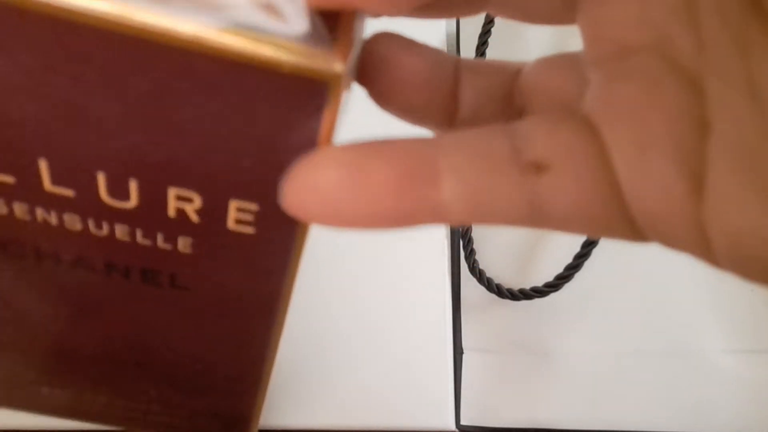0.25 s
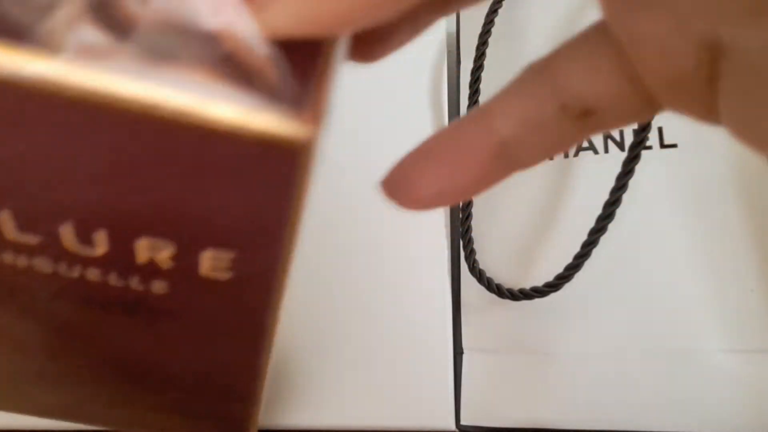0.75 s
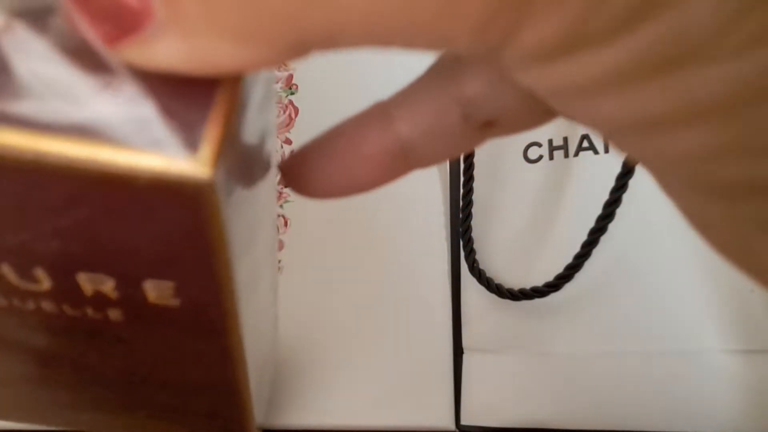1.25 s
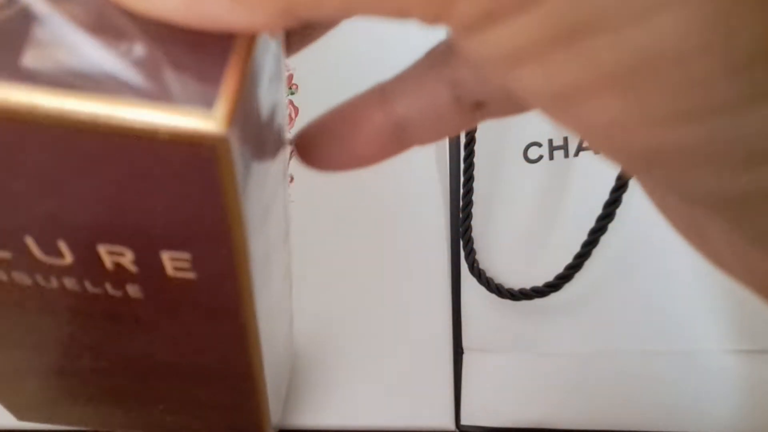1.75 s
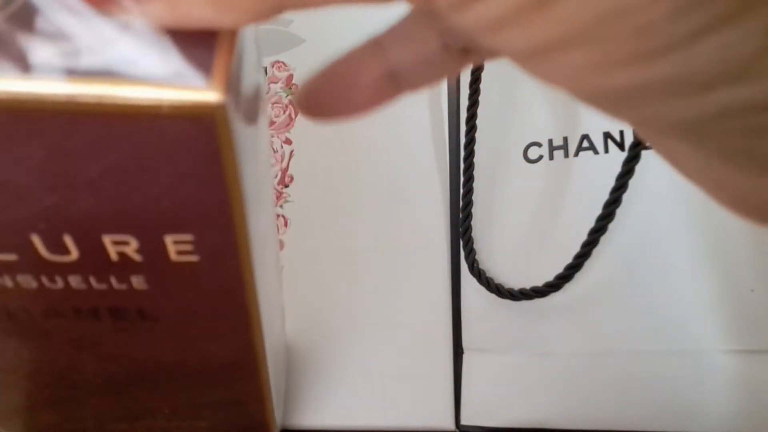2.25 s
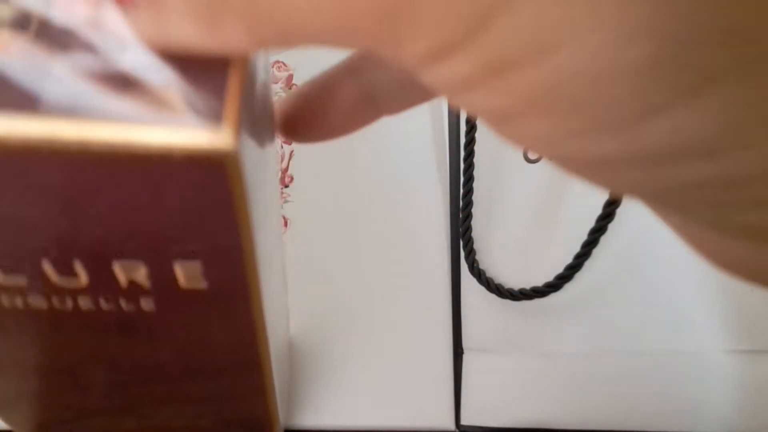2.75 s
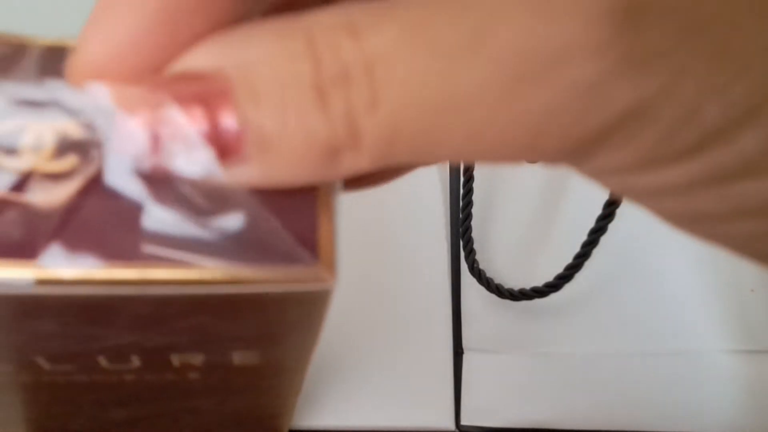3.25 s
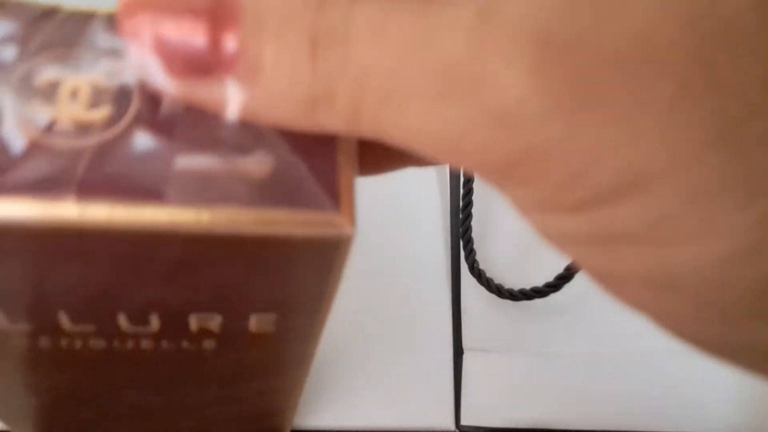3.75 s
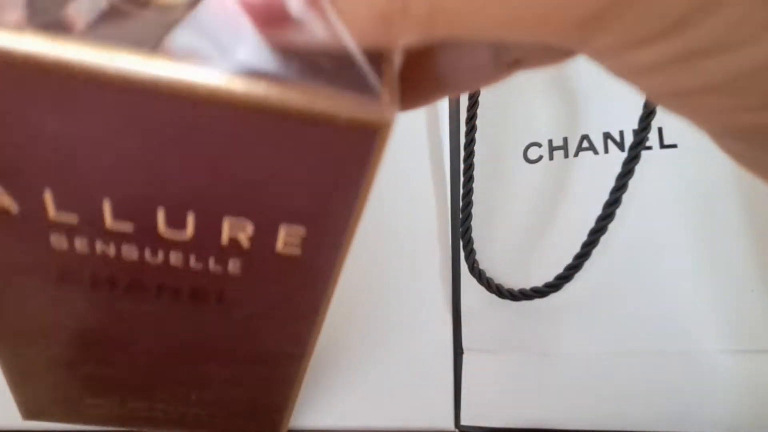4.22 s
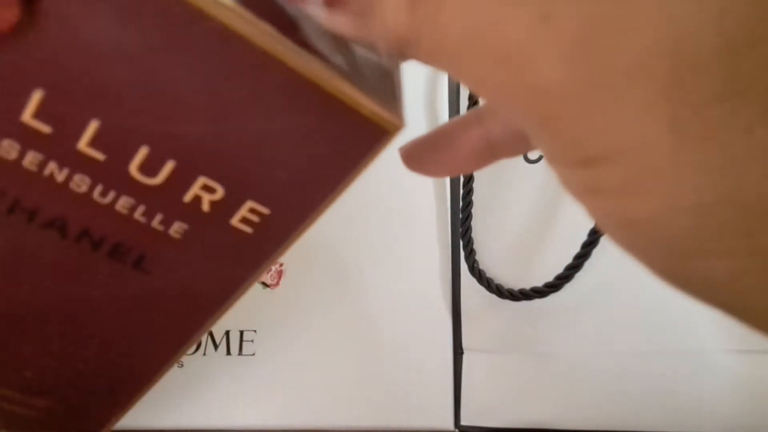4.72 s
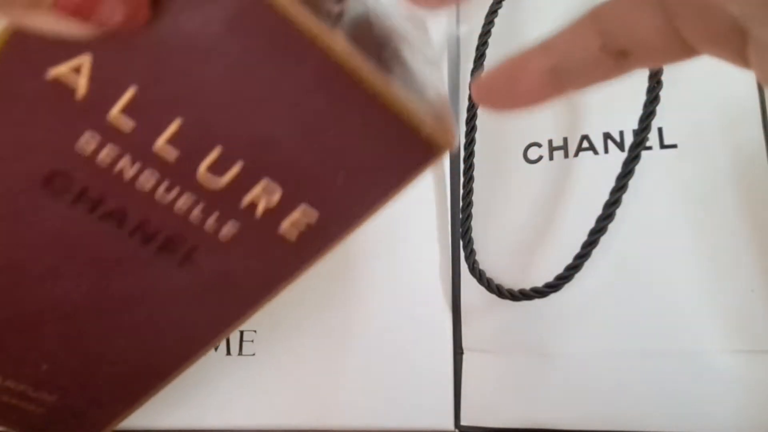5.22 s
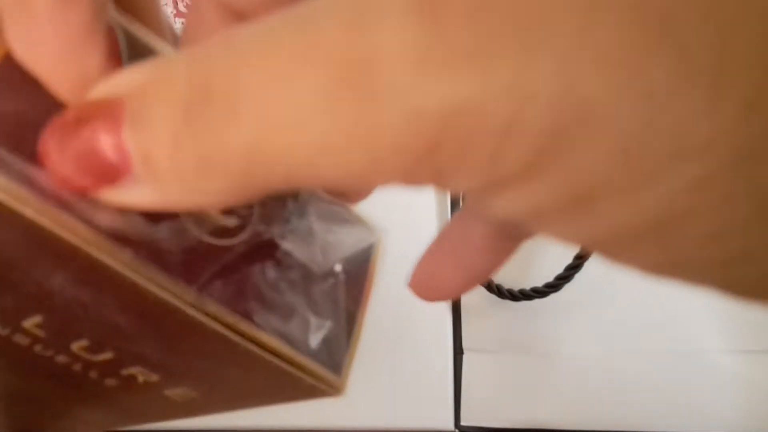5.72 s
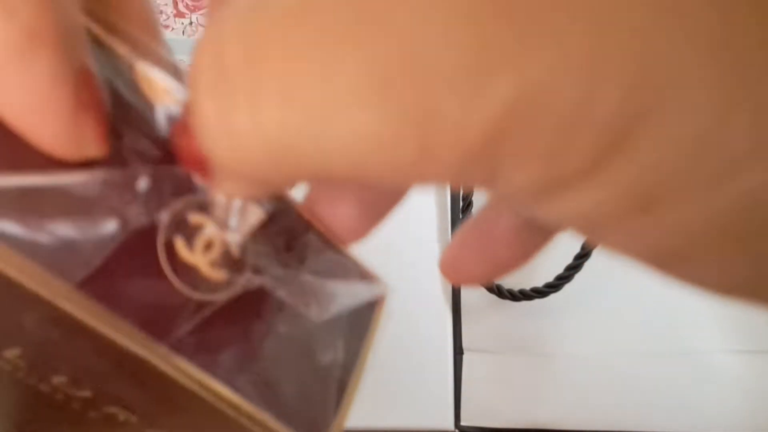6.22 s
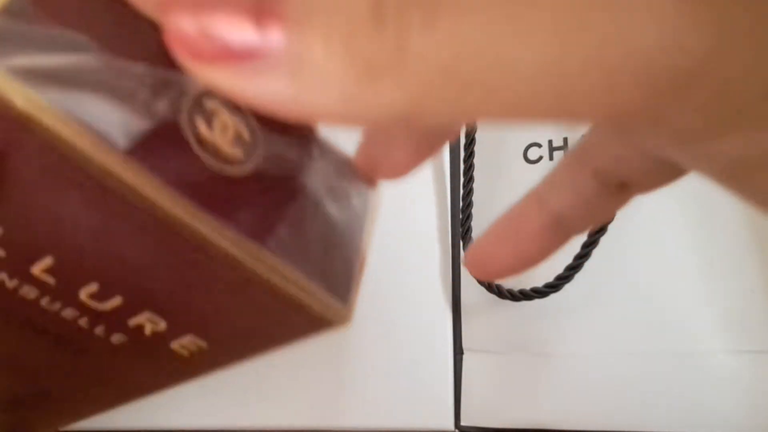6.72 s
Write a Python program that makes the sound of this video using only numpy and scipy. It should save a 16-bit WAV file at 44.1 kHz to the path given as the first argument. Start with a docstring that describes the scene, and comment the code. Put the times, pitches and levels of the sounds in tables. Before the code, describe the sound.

Very close, fingers pick at crisp cellophane on a small cardboard box. Sparse bright snaps and fine crinkles mix with soft hollow fingertip thumps and brief grainy rubs. After a quieter middle, the crackling thickens and loosens, then the seal tears in a rapid run of loud cracks with one very short falling squeak. Small room, close stereo microphone leaning left, faint steady hush.

```python
"""Sharp crackles and soft thumps: fingers pick and peel the cellophane off a small cardboard box, close by.
Creases snap as short clicks plus decaying noise, and shake the box; tiny creases crinkle in between.
Fingertips knock, which rings the box's own pitches, and slide, which makes filtered grainy noise.
Near the end the seal tears open in a run of loud cracks and one short squeak, a wavering falling tone.
A small room adds close echoes, a faint tail and a steady hush."""
import sys
import numpy as np
from scipy import signal
from scipy.fft import rfft, irfft, next_fast_len
from scipy.io import wavfile
from scipy.ndimage import uniform_filter1d

SR = 44100
rng = np.random.default_rng(int(sys.argv[2]) if len(sys.argv) > 2 else 0)


def master(y):
    """Save y as 16-bit WAV."""
    cut = np.clip(np.atleast_2d(y).T, -1, 1)
    pcm = np.round(cut * 32767)  # scale
    wavfile.write(sys.argv[1], SR, pcm.astype(np.int16))


N = 307377

# The creases that snap loudly. Each row: start in seconds, relative energy of the bright tick in dB,
# how hard the box answers compared with the tick in dB (before a small trim).
SNAPS = [(0.179, -19, -25), (0.2075, -8.5, -11.5), (0.2885, -17, -12), (0.3895, -17, -12.5),
         (0.434, -14, -14), (0.5852, -13, -22), (0.6356, -15, -20), (0.6833, -8, -22.5),
         (0.6951, -11.5, -15), (0.7884, -11, -10), (0.9223, -15, -14), (1.2393, -27.5, 0),
         (1.4148, -16.5, -10.5), (1.4376, -13, -14.5), (1.609, -8, -15), (1.7002, -16.5, -12),
         (1.7403, -2.5, -19.5), (2.008, -24, -6.5), (2.0531, -19.5, -2.5), (2.0624, -15, -14.5),
         (2.2018, -17.5, -11.5), (2.6856, -17.5, -14), (2.7004, -12, -12), (2.8074, -14, -10),
         (2.912, -12.5, -18), (2.9448, -23.5, -7), (2.9759, -12.5, -17), (2.9989, -18, -12),
         (3.0499, -18, -10), (3.1486, -15, -17), (3.1913, -22, -7.5), (3.268, -15, -13.5),
         (3.344, -25.5, -14), (3.431, -19.5, -6), (3.4762, -13, -20.5), (3.5503, -28.5, 0),
         (3.836, -21.5, -3.5), (3.9912, -8.5, -20), (4.0933, -7.5, -28.5), (4.1134, -13.5, -3),
         (4.1725, -15, -6), (4.2563, -22.5, -4), (4.3056, -9, -19), (4.3185, -11, -15.5),
         (4.4777, -15, -11), (4.5195, -12, -8.5), (4.5372, -16, -2.5), (4.5999, -22.5, 0.5),
         (4.623, -7.5, -14), (4.716, -22, -12), (4.7492, -22.5, -15.5), (4.8046, -5, -17),
         (4.829, -10.5, -18.5), (4.8963, -12, -7.5), (5.0432, 0.5, -14.5), (5.1087, -15, -3.5),
         (5.1663, -22.5, -10), (5.2377, -5, -17), (5.2845, 3, -20), (5.3334, -7.5, -23), (5.449, -35, 14.5),
         (5.5033, -8, -30.5), (5.5804, -18.5, -11), (5.6057, -15, 0.5), (5.639, -7, -14),
         (5.7053, -17.5, -14), (5.7229, -6, -14.5), (5.7302, -15, -6.5), (5.7611, -9, -23.5),
         (5.9738, -9, -20), (6.0059, -13.5, -17.5), (6.0467, -7.5, -21), (6.1459, -11, -20.5),
         (6.1831, 2.5, -13.5), (6.2016, 2, -7), (6.205, 0, -26), (6.2251, -2, -22), (6.2954, -9, -11),
         (6.361, 5.5, -6.5), (6.3786, -6.5, -16), (6.3966, -2.5, -8.5), (6.4968, -16.5, -13),
         (6.5531, -12, -6), (6.5699, 0, -8), (6.5851, 2.5, -25), (6.6316, -6.5, 3), (6.6447, -8.5, -3),
         (6.6561, -2.5, -20), (6.7102, -3.5, -3), (6.7642, -17, -9), (6.777, -21.5, 4.5),
         (6.8361, -8.5, -6.5), (6.894, -11.5, -0.5), (6.9062, -2, -4), (6.9203, -21, 1)]


def amp(db):
    """Turns decibels into gain."""
    return 10 ** (np.asarray(db) / 20)


def read(points, hz):
    """Reads a table of (Hz, value) at any frequency, joining its points on a log-frequency axis."""
    f, value = np.transpose(points)
    return np.interp(np.log(hz + 1), np.log(f), value)


def unit(x):
    """Scales a sound to a total energy of 1, averaged over its channels."""
    return x / np.sqrt(np.mean(np.sum(x ** 2, -1)) + 1e-20)


def add(mix, s, sound):
    """Lays a sound into the mix at time s in seconds."""
    start = max(round(s * SR), 0)
    part = mix[:, start:][:, :sound.shape[-1]]
    part += sound[..., :part.shape[1]]


def colour(points, size=2048):
    """Makes the most compact impulse response with this spectrum (minimum phase: nothing sounds early)."""
    log_gain = np.log(amp(read(points, abs(np.fft.fftfreq(size, 1 / SR)))))
    return np.fft.ifft(np.exp(np.conj(signal.hilbert(log_gain)))).real[:size // 2]


def through(x, response):
    """Filters x by an impulse response, keeping its length."""
    return signal.fftconvolve(np.atleast_2d(x), np.atleast_2d(response), axes=1)[:, :x.shape[-1]]


def snaps(colours, db=0.53, box_trim_db=-0.4, after_db=-19, after_s=0.012, lead_in_db=-20):
    """Each loud snap has a faint copy 1 to 2 ms ahead of it, and quieter snaps follow."""
    out = np.zeros((2, N))
    for s, tick_db, box_db in SNAPS:
        tick, crack, answer = snap(colours)
        # a large crease shakes the box and also cracks lower; so does film that has come loose
        loose_db = 4 if s > 4.3 else 0
        crack_db = -4 + 0.6854 * box_db + loose_db
        film = amp(tick_db) * (tick + amp(crack_db) * crack)
        add(out, s, film + amp(tick_db + box_db + box_trim_db) * answer)
        add(out, s - rng.uniform(0.001, 0.002), amp(lead_in_db) * film)
        waits, varies_db = rng.exponential(after_s, size=3), rng.normal(0, 5.2, size=3)
        for wait, vary_db in zip(waits, varies_db):
            # later followers tend to be quieter
            add(out, s + wait, amp(after_db + vary_db - 6 * wait / after_s) * film)
    return amp(db) * out


def snap(colours, size=2048):
    """One flip of the film, as three parts of energy 1: bright tick, lower crack, answer of the box's panels."""
    t = np.arange(size) / SR
    tick = burst(t, flutter_s=0.00085, flutter_db=-1, facet_db=-8, ring_s=0.0014, ring_db=-5.0)
    # slower waves linger in the crack
    crack = burst(t, flutter_s=0.00054, flutter_db=14, facet_db=7, ring_s=0.0027, ring_db=9.0)
    push = rng.standard_normal(size) * (np.exp(-t / 0.00064) + 0.5 * np.exp(-t / 0.0096))
    return [unit(through(x, response)) for x, response in zip((tick, crack, push), colours)]


def burst(t, flutter_s, flutter_db, facet_db, ring_s, ring_db):
    """A crease flips (a click), the film flutters (noise) and one facet rings at its own pitch."""
    # Tone on the right. Each row: frequency in Hz, relative level in dB.
    right_tone = [(200, 4), (1100, 6.5), (2300, 13), (3700, -8), (5500, 7), (7500, 1), (9500, -49),
                  (12500, -5), (15500, -17.5)]
    flutter, own, ring_left, ring_right = rng.standard_normal((4, len(t)))
    attack = 1 - np.exp(-t / 0.00011)
    fade = np.exp(-t / (flutter_s * rng.uniform(1.0, 1.35))) * attack
    facet = unit(np.sin(2 * np.pi * rng.uniform(2280, 14060) * t) * np.exp(-t / 0.00052))
    flip = np.roll(t == 0, rng.integers(2, 12)) * rng.choice([-1, 1])
    left = flip + amp(flutter_db) * unit(flutter * fade) + amp(facet_db) * facet
    right = through(0.12 * left + 0.78 * unit(own * fade), colour(right_tone))[0]
    right = right * amp(rng.normal(0, 1.2))
    ring = unit(np.array([ring_left, 0.72 * ring_right]) * np.exp(-t / ring_s))
    return np.array([left, right]) + amp(ring_db) * ring


def crinkle(colours, per_s=110, spread_db=7.5, crack_db=-11, relax_s=0.032, rubbed_db=29,
            stray_per_s=10, stray_db=-46, count=24):
    """Strain builds around snaps and under a sliding finger; tiny creases give way, a few even at rest."""
    full_strain_db = -36.5
    strain_follow = 0.42  # how closely strain follows the strength of a snap, 0 to 1
    build_share = 0.35  # strain before a snap, compared with after it
    jolts = np.zeros(N)
    for s, tick_db, _ in SNAPS:
        jolts[min(int(s * SR), N - 1)] = amp(strain_follow * tick_db)
    fading = [1, -np.exp(-1 / (relax_s * SR))]
    relaxing = signal.lfilter([1], fading, jolts)
    building = signal.lfilter([1], fading, jolts[::-1])[::-1]  # run backwards in time
    strain = relaxing + build_share * building + amp(rubbed_db) * rubbing()
    strained = (rng.random(N) < per_s * np.sqrt(strain) / SR) * strain * amp(full_strain_db)
    stray = (rng.random(N) < stray_per_s / SR) * amp(stray_db)
    flips = (strained + stray) * amp(spread_db * np.minimum(rng.exponential(1, N), 3))
    creases = []
    for _ in range(count):
        tick, crack, _answer = snap(colours)
        creases.append(tick + amp(rng.normal(crack_db, 6.9)) * crack)
    out = np.zeros((2, N))
    for at in np.flatnonzero(flips):
        add(out, at / SR, flips[at] * creases[at % count])
    return out


def knocks(size=10000, focus_db=6.0, chatter=0.79, place_db=2):
    """A soft push lands and settles; the box's own pitches near the centre of the push ring most."""
    # The box's own ringing pitches. Each row: frequency in Hz, relative level in dB,
    # time to fade by 60 dB in seconds.
    box_modes = [(77, -8.5, 0.0568), (134.8, -1.5, 0.078), (244.7, 1, 0.1), (326.5, -3, 0.046),
                 (439.3, 2.5, 0.06), (564, -13, 0.053), (707, -1.5, 0.03), (1038, -2.5, 0.015)]
    out, t = np.zeros((2, N)), np.arange(size) / SR
    for s, db, contact_s, centre_hz in pushes():
        ring = np.zeros(size)
        press = t / contact_s * np.exp(-t / contact_s)
        for hz, mode_db, t60 in box_modes:
            turn = 2 * np.pi * hz * rng.normal(1, 0.046) * t  # the grip detunes each mode
            rough = 10 * chatter * rng.standard_normal(size)
            force = press * (np.sin(turn + 2 * np.pi * rng.random()) + rough)
            mode = unit(through(force, np.sin(turn) * amp(-60 * t / t60))[0])
            off_centre_db = focus_db * np.log2(hz / centre_hz) ** 2
            ring += amp(mode_db + place_db * rng.standard_normal() - off_centre_db) * mode
        add(out, s, amp(db + 5.0) * unit(ring))
    return out


def pushes():
    """Fingertips and the hardest snaps push the box: rows of (s, relative level dB, contact s, centre Hz)."""
    # Fingers bump the box. Each row: start in seconds, relative level in dB, centre of the push in Hz.
    bumps = [(0.000, -20.5, 278), (0.135, -12.5, 357), (0.355, -25.5, 603), (1.228, -20.5, 296),
             (1.534, -33.5, 415), (1.690, -14, 380), (2.412, -33, 482), (2.667, -28, 475),
             (2.944, -20.5, 385), (3.540, -30, 450), (4.484, -12, 312), (5.039, -20, 493),
             (6.177, -13.5, 110)]
    landing_s = 0.0058  # how long a fingertip takes to land
    # a snap that shakes the box harder than this also rocks it, like a brief knock
    jolt_over_db = -22
    jolt_db, jolt_s, jolt_hz = -18, 0.0014, 450
    rows = [(s, db, landing_s, hz) for s, db, hz in bumps]
    for s, tick_db, box_db in SNAPS:
        if tick_db + box_db > jolt_over_db:
            rows.append((s, tick_db + box_db + jolt_db, jolt_s, jolt_hz))
    return rows


def slide(grip_db=0.0):
    """Rubbing skin makes the dull murmur of the grip, and the brighter strokes of a fingertip."""
    # The grip on the box tightens as the work goes on. Each row: time in seconds, level in dB.
    handling = [(0.5, -82.5), (3.89, -62.5), (3.96, -58), (4.61, -58), (5.06, -59.5), (5.42, -53),
                (5.71, -57.5), (6.97, -57)]
    # Tones of grip and stroke. Each row: frequency in Hz, relative level in dB per Hz.
    grip_tone = [(25, -10.5), (70, -4), (130, -4.5), (240, 0), (450, -1.5), (650, -9.5), (1100, -12),
                 (1500, -24.5), (3000, -39), (9000, -42)]
    stroke_tone = [(100, -22), (250, -2.5), (450, 3), (700, 2), (1050, 0.5), (1500, -8.5), (2300, -12),
                   (4000, -16.5), (7400, -15.5), (13000, -18.5), (17000, -34)]
    stroke = rubbing()
    held = amp(np.interp(np.arange(N) / SR, *np.transpose(handling)) + grip_db)
    grip = held + amp(-11) * stroke  # a stroke also stirs the grip a little
    murmur = grip * friction(grip_tone, catches_per_s=1500, spread_db=3)
    return murmur + stroke * friction(stroke_tone, catches_per_s=480, spread_db=4)


def rubbing():
    """The gain of the strokes: a fingertip lands, its rubbing grows or fades as it slides, and it lifts."""
    # A fingertip slides over the wrap. Each row: start in seconds, length in seconds,
    # final level in dB, rise on the way there in dB (negative: a fall).
    strokes = [(0.0, 0.15, -72.5, -8.5), (0.213, 0.18, -57, 11), (2.212, 0.24, -67, -5),
               (3.818, 0.15, -59, 2.5), (4.099, 0.032, -47.5, -1.5), (4.275, .24, -45.5, 18),
               (4.522, 0.106, -48, -3.5), (4.755, 0.065, -60, -11), (5.285, 0.18, -46.5, -1.5),
               (6.35, 0.02, -42, -1), (6.528, 0.11, -33, 21), (6.899, 0.15, -44, 4.5)]
    attack_s, release_s = 0.016, 0.02
    level, t = np.zeros((1, N)), np.arange(SR // 2) / SR
    for start, length, db, swell_db in strokes:
        press = amp(db + swell_db * (np.minimum(t / length, 1) - 1))
        landing = np.minimum(t / attack_s, 1)
        lifting = np.exp(-np.maximum(t - length, 0) / release_s)
        add(level, start, press * landing * lifting)
    return level[0]


def friction(spectrum, catches_per_s, spread_db):
    """Skin and film slip in tiny random catches, short noise grains that excite the wrapped box."""
    strengths = amp(spread_db * np.minimum(rng.exponential(1, N), 3))
    catches = (rng.random(N) < catches_per_s / SR) * strengths
    grain = np.sqrt(signal.lfilter([1], [1, -np.exp(-1 / (0.002 * SR))], catches ** 2))
    return np.sqrt(N) * unit(diffuse(grain * rng.standard_normal((2, N)), spectrum))


def squeak(jitter, overtone_db):
    """Film sticks and slips on card: an unsteady tone with overtones, slowing as the tension goes."""
    start_s, length_s, level_db = 6.507, 0.049, -39.5
    start_hz, sag_hz_per_s = 1540, 8000
    t = np.arange(0, length_s, 1 / SR)
    waver = uniform_filter1d(rng.standard_normal(len(t)), size=60)
    pitch = (start_hz - sag_hz_per_s * t) * (1 + jitter * waver / waver.std())
    phase = 2 * np.pi * np.cumsum(pitch) / SR
    arch = amp(level_db) * np.sin(np.pi * t / length_s)
    tone = sum(amp(overtone_db * k) * np.sin((k + 1) * phase) for k in range(4))
    out = np.zeros((2, N))
    add(out, start_s, arch * tone)
    return out


def diffuse(pair, spectrum):
    """Blends two unrelated signals into one coloured sound field, partly alike on left and right."""
    # How alike left and right are. Each row: frequency in Hz, likeness (1 is identical, 0 unrelated).
    likeness = [(100, 0.69), (500, 0.98), (1000, 0.32), (2000, 0.17), (4000, 0)]
    # Tone of the right side. Each row: frequency in Hz, right minus left in dB.
    right_tilt = [(1100, 0), (3700, 1.5), (7500, -6), (9500, -6), (12500, -5.5), (15500, 3)]
    size = next_fast_len(pair.shape[1], True)
    hz = np.fft.rfftfreq(size, 1 / SR)
    a, b = rfft(pair, size)
    same = np.clip(read(likeness, hz), -1, 1)
    right = (same * a + np.sqrt(1 - same ** 2) * b) * amp(read(right_tilt, hz))
    return irfft(np.array([a, right]) * amp(read(spectrum, hz)), size)[:, :pair.shape[1]]


def room(x, near_db=-13, near_s=0.0046, near_fade_s=0.01):
    """The table and a paper bag throw back a quick cluster of echoes; the room adds a faint tail."""
    # How long the room rings. Each row: frequency in Hz, time to fade by 60 dB in seconds.
    fade_times = [(200, 0.43), (700, 0.12), (2000, 0.53), (3500, 0.28), (7000, 1.08), (13000, 1.07)]
    # How much the room returns. Each row: frequency in Hz, relative level in dB.
    returned = [(200, -5), (700, -7), (2000, -11.5), (4500, -15.5), (7500, -24.5), (10000, -30),
                (13000, -26.5)]
    size = SR // 2
    hz, t, z = signal.stft(rng.standard_normal((2, size)), SR, nperseg=256)
    t60 = read(fade_times, hz)[:, None]
    fading = z * amp(-60 * t / t60) / np.sqrt(t60)
    tail = signal.istft(fading, SR, nperseg=256)[1][:, :size]
    t = np.arange(size) / SR
    tail = diffuse(unit(tail * np.clip(t / near_s - 1, 0, 1)), returned)
    taps = rng.standard_normal((2, size)) * (rng.random((2, size)) < 2500 / SR)  # 2500 echoes per second
    taps = unit(taps * (t > near_s) * np.exp(-t / near_fade_s))
    near = diffuse(taps, [(300, -1.7), (3000, 0.97), (12000, 0.2)])  # (Hz, dB)
    source = x.mean(0) * 0.5 + x[0] * 0.5  # leans to the left
    return through(source, tail + amp(near_db) * near)


def right_late(pair):
    """Sound from the left reaches the right microphone a little later."""
    delay_s = 0.00018
    return np.array([pair[0], np.pad(pair[1], (round(delay_s * SR), 0))[:N]])


def room_tone(db=-71):
    """The steady hush of the room, as coloured noise."""
    # Tone of the hush. Each row: frequency in Hz, relative level in dB per Hz.
    hush_tone = [(25, 2), (60, -5.5), (105, 6.5), (200, -11), (450, -7), (1050, -7.5), (1500, -19),
                 (3500, -24.5), (7300, -23.5), (9500, -20), (12500, -14.5), (16000, -24.5)]
    return amp(db) * np.sqrt(N) * unit(diffuse(rng.standard_normal((2, N)), hush_tone))


def scene():
    """Film and box close by, in the room."""
    # Tones of a snap's three parts. Each row: frequency in Hz, relative level in dB per Hz.
    tick_tone = [(3500, -34), (6000, -10.5), (7500, -4.5), (9500, -2), (11000, 1), (12600, 2),
                 (14200, -1.5), (15600, -8), (17000, -21)]
    crack_tone = [(900, -11), (1500, -3.5), (2300, 1.5), (3100, -1.5), (4300, 3.5), (6600, 5.5),
                  (7800, 1.5), (10000, -54)]
    panel_tone = [(90, -26.5), (220, -7.5), (450, -6.5), (750, -0.5), (1030, 3), (1300, -6), (1800, -11),
                  (3500, -41.5)]
    colours = [colour(spectrum) for spectrum in (tick_tone, crack_tone, panel_tone)]
    close = snaps(colours) + crinkle(colours) + knocks() + squeak(jitter=0.13, overtone_db=-2.5)
    return right_late(close + room(close) + slide()) + room_tone()


def record(dry):
    """The loudest peaks are rounded off softly; then the highest treble is cut off."""
    low_pass = signal.firwin(201, 16500, window=("kaiser", 8), fs=SR)  # cutoff in Hz
    return signal.oaconvolve(np.tanh(dry), low_pass[None], "same")


dry = scene()
out = record(dry)
master(out)
```